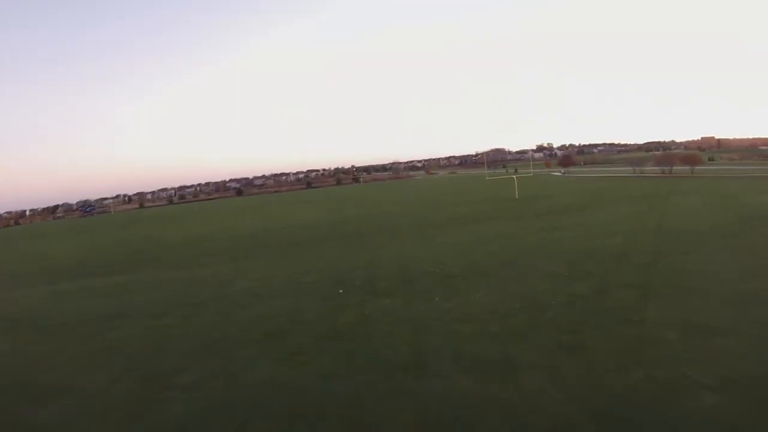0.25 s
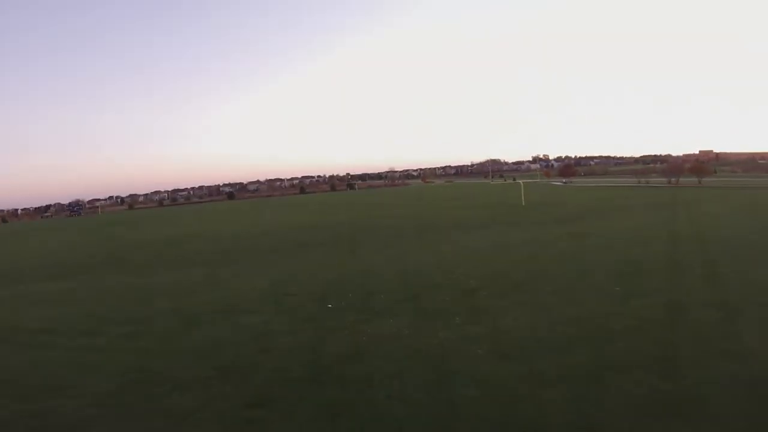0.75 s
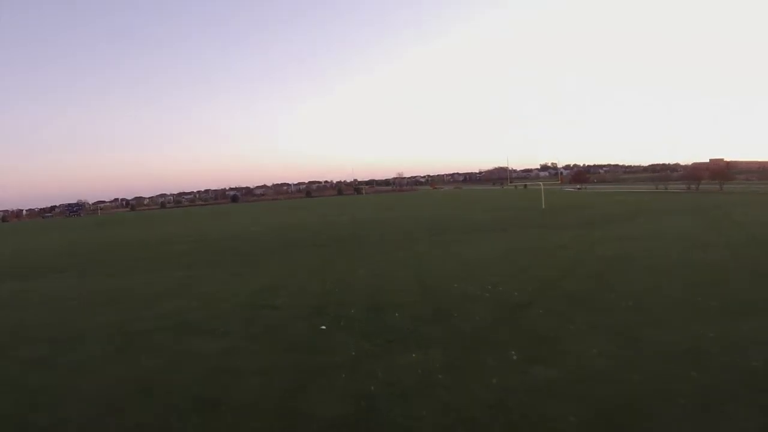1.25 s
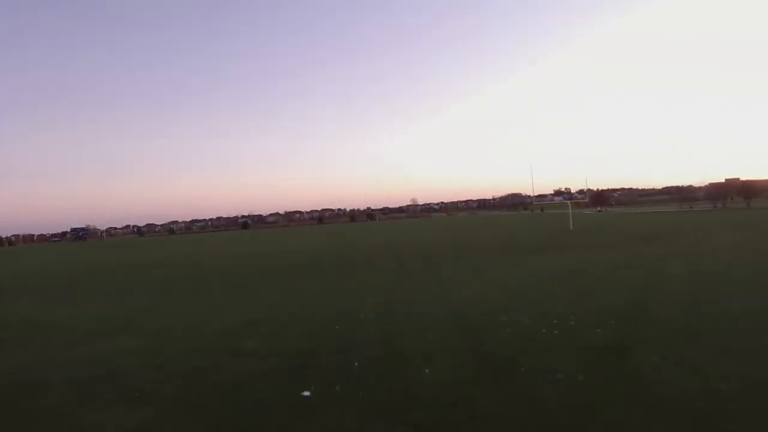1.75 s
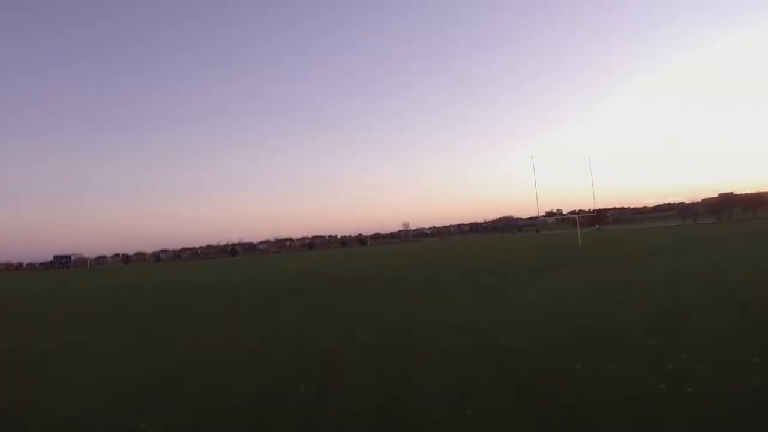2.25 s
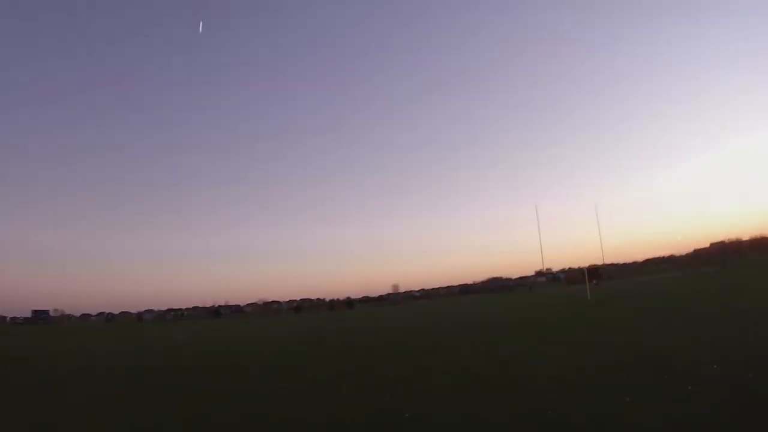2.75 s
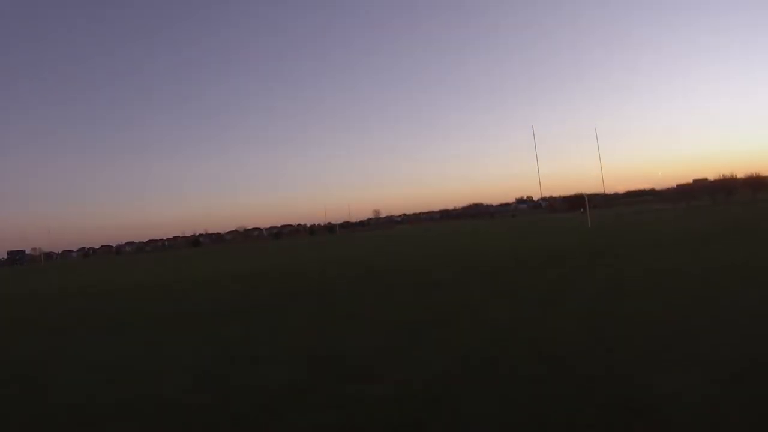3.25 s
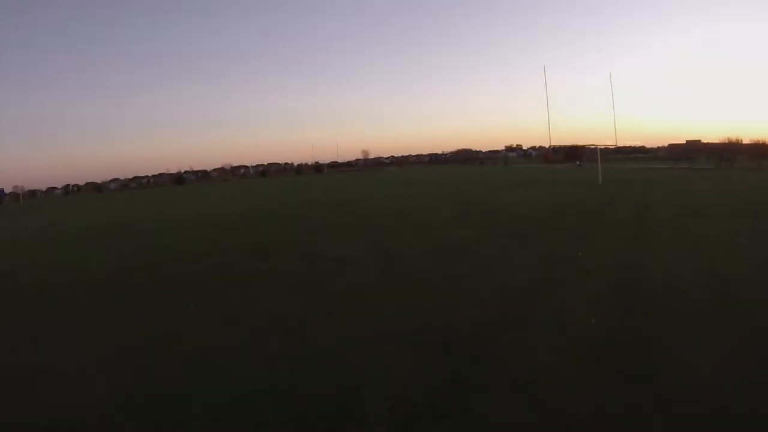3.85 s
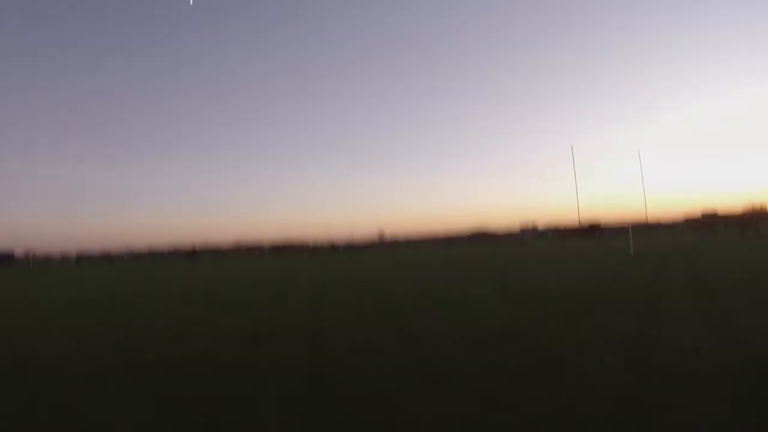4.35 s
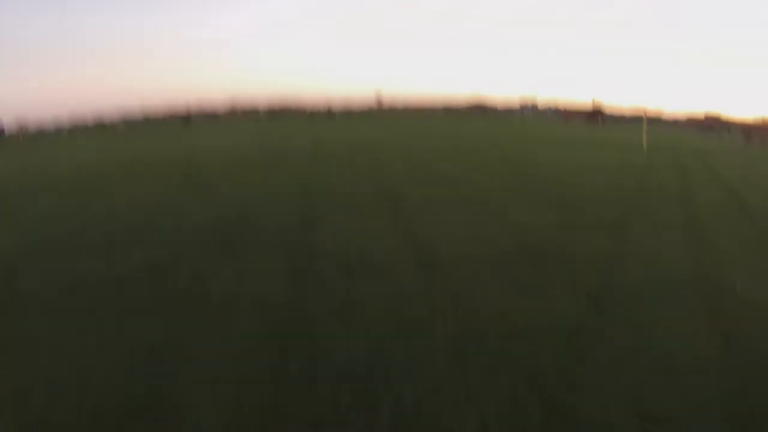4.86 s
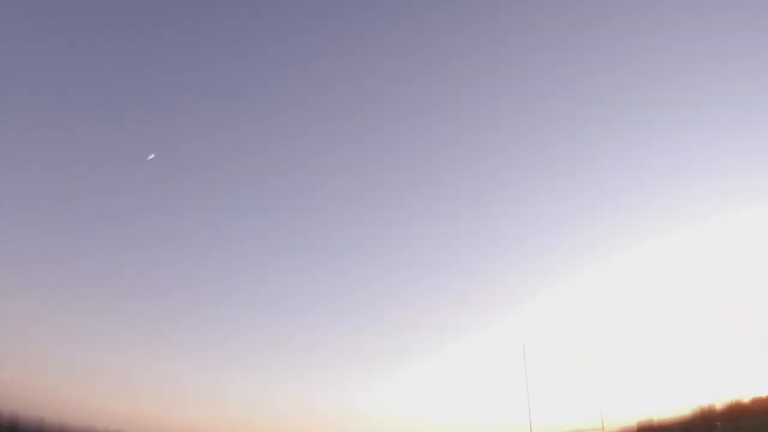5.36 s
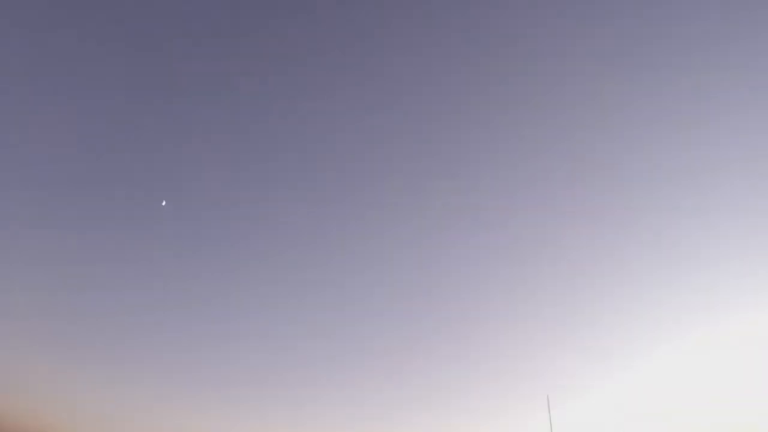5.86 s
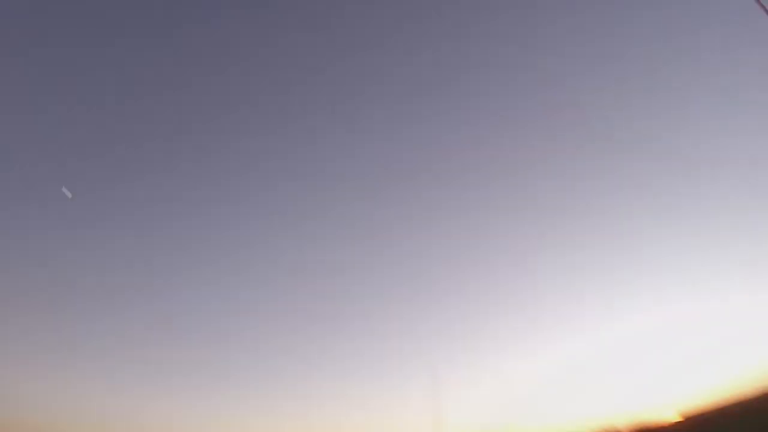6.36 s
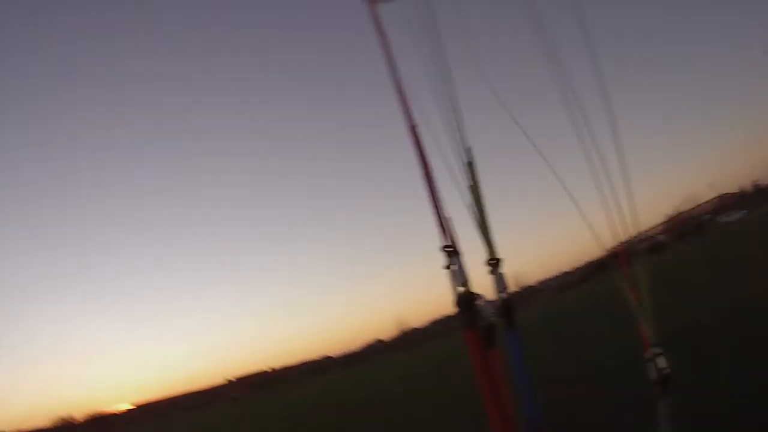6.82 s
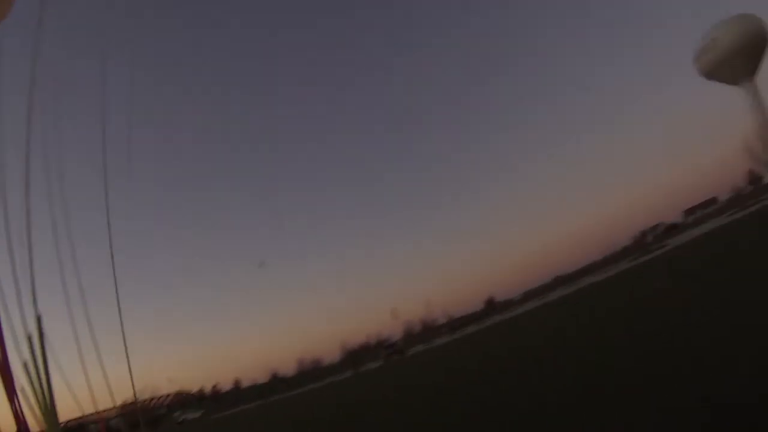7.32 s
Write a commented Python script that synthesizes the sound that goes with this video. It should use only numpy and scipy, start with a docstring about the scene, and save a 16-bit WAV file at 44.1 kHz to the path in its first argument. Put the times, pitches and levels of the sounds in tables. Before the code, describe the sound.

A muffled, fluttering engine-and-wind roar with a faint falling whistle fades, then a loose plastic case clacks, chatters and booms to the end.

```python
"""A muffled, fluttering roar with a faint falling whistle; then a plastic case clacks, chatters and booms.
Engine, propeller and airflow of a powered paraglider reach a camera through its closed case: shaped noise.
The case works loose: bouncing contacts excite its damped modes, jolts set it booming and its mount swinging.
Random ticks, nudges and a few treble snaps fill in; a look-ahead limiter and a low-pass follow."""
import sys
import numpy as np
from scipy import signal
from scipy.fft import rfft, irfft
from scipy.io import wavfile
from scipy.ndimage import uniform_filter1d, minimum_filter1d

SR = 44100
rng = np.random.default_rng(int(sys.argv[2]) if len(sys.argv) > 2 else 0)


def bounce(signal):
    """Save signal as a 16-bit WAV file at the path given by the first command-line argument."""
    frames = np.transpose(np.atleast_2d(signal))
    limited = np.clip(frames, -1, 1)
    pcm = np.round(limited * 32767).astype(np.int16)
    wavfile.write(sys.argv[1], SR, pcm)


N = 334719

# modes of the case shell: [f/Hz, level/dB, t60/s]
SHELL_MODES = [(575, 11, 0.0072), (599, 6.5, 0.024), (1022, 5.5, 0.013), (1421, -8, 0.035),
               (1672, 1.5, 0.014), (1956, 3.5, 0.0037), (2165, 3, 0.016), (3000, -10, 0.008),
               (3450, -18.5, 0.012), (3970, -35, 0.015), (5040, -30.5, 0.016), (5200, -30.5, .008),
               (6320, -33.5, 0.0096)]
# low booming modes of the case: [f/Hz, level/dB, t60/s]
BOOM_MODES = [(196.2, -1, 0.072), (116, 2.5, 0.02)]
# slow modes of the mount: [f/Hz, level/dB, t60/s]
SWING_MODES = [(27.14, 10.3, 0.3), (45.2, 7.3, 0.086)]
# bands the case passes weakly: [low f/Hz, high f/Hz, share lost/0-1]
WEAK_BANDS = [(2424, 2850, 0.6), (5670, 5950, 0.9)]
SHELL_CUT_HZ = 7850  # the case dulls clacks and ticks above this


def amp(db):
    """Gain of a level in dB."""
    return 10 ** (np.asarray(db) / 20)


def rms_one(x):
    """Scale to rms 1."""
    return x / np.sqrt(np.mean(x ** 2) + 1e-20)


def in_time(rows):
    """Columns of a curve table, interpolated to every sample."""
    s, *columns = np.transpose(rows)
    return [np.interp(np.arange(N) / SR, s, c) for c in columns]


def lowpass(x, hz):
    """Second-order low-pass."""
    return signal.sosfilt(signal.butter(2, hz, fs=SR, output="sos"), x)


def drift(hz):
    """Low-passed noise of rms 1, without the filter's first second."""
    return rms_one(lowpass(rng.standard_normal(N + SR), hz)[SR:])


def decay_per_sample(t60_s):
    """Factor that gives a 60 dB decay in t60_s."""
    return amp(-60 / (t60_s * SR))


def impulses(at, sizes):
    """Clicks of the given sizes at the given samples."""
    return np.bincount(at, sizes, N)[:N]


def ring(clicks, hz, t60_s):
    """Two-pole resonator: a unit click starts a decaying sine of height 1."""
    r, w = decay_per_sample(t60_s), 2 * np.pi * hz / SR
    return signal.lfilter([0, np.sin(w)], [1, -2 * r * np.cos(w), r * r], clicks + 1e-18)


def strike(at, sizes, modes, hollow_db=0, scatter_db=3.5, treble_db=0, count=1):
    """Each contact excites each mode by a chance share, partly common to the count contacts of a blow."""
    hollow_hz, bright_hz, hard_hz = 600, 2100, 3700  # no hollow part from hard_hz up
    contact_cut = 2.4  # contact low-pass, in multiples of the mode's pitch
    luck = rng.standard_normal((len(at), len(modes)))
    blow_luck = rng.standard_normal((len(at) // count, len(modes)))
    luck = luck + .5 * np.repeat(blow_luck, count, axis=0)
    out = np.zeros(N)
    for k, ((hz, level_db, t60_s), own) in enumerate(zip(modes, luck.T)):
        # modes far from the bright ring follow the hollow part more
        distance = abs(np.log(bright_hz / hz)) / np.log(bright_hz / hollow_hz)
        depth = np.minimum(distance, 1) * (hz < hard_hz)
        share_db = level_db + scatter_db * own + depth * hollow_db
        share_db = share_db + (hz > WEAK_BANDS[0][0]) * treble_db
        clicks = impulses(at, sizes * amp(share_db))
        for _ in range(2):  # softens the onset of the ring
            clicks = lowpass(clicks, contact_cut * hz)
        out += (-1) ** k * ring(clicks, hz, t60_s)  # neighbours start in opposite directions
    return out


def roar():
    """Broad noise with resonances of case and air cavity; its level follows a curve and flutters."""
    # overall level: [t/s, level/dB]
    roar_level = [(0, -33), (2.2, -36.5), (2.37, -42.5), (3.75, -49), (7.59, -51.5)]
    # broad spectrum: [f/Hz, density/dB per Hz, relative]
    roar_colour = [(12, -8.5), (160, -8), (300, -14.5), (900, -20), (1100, -26), (2400, -21.5), (3800, -31),
                   (4300, -43), (5800, -59), (10000, -50), (15000, -73)]
    # resonances: [f/Hz, width/Hz, density/dB per Hz, relative]
    roar_peaks = [(199.7, 31, 1), (739, 35, -4.5), (1320, 680, -15), (1740, 790, -16.5),
                  (4900, 1100, -34.5), (6800, 2100, -42), (7900, 270, -40.5)]
    flutter_db, flutter_hz = .7, 7
    hz = np.maximum(np.arange(N // 2 + 1) * SR / N, 1)
    colour_hz, colour_db = np.transpose(roar_colour)
    power = amp(np.interp(np.log(hz), np.log(colour_hz), colour_db)) ** 2
    for centre_hz, width_hz, level_db in roar_peaks:
        power += amp(level_db) ** 2 / (1 + (2 * (hz - centre_hz) / width_hz) ** 2) ** 2
    noise = irfft(rfft(rng.standard_normal(N)) * np.sqrt(power), N)
    return rms_one(noise) * amp(in_time(roar_level)[0] + flutter_db * drift(flutter_hz))


def whistle():
    """A sine of falling, unsteady pitch: phase is the running sum of frequency."""
    # glide: [t/s, f/Hz, peak level/dB]
    whistle_glide = [(1.25, 3730, -62), (1.5, 3570, -54), (1.92, 3420, -56), (2.1, 3400, -78)]
    hz, level_db = in_time(whistle_glide)
    unsteady_hz = hz + 20 * drift(33)
    return amp(level_db) * np.sin(2 * np.pi * np.cumsum(unsteady_hz) / SR)


def snaps():
    """A few contacts end in a snap: high-passed noise that dies within milliseconds."""
    # snaps: [t/s, starting noise level before the high-pass/dB]
    snap_list = [(2.362, -32.5), (2.91, -39), (6.304, -41), (7.34, -43)]
    snap_hz, t60_s = 5000, 0.0099
    s, level_db = np.transpose(snap_list)
    clicks = impulses((s * SR).astype(int), amp(level_db))
    fade = signal.lfilter([1], [1, -decay_per_sample(t60_s)], clicks + 1e-18)
    highpass = signal.butter(2, snap_hz, "high", fs=SR, output="sos")
    return signal.sosfilt(highpass, fade * rng.standard_normal(N))


def rattle():
    """Light random contacts of the loose case, in clumps: each ticks the shell and nudges case and mount."""
    # looseness of the case: [t/s, share/0-1]
    looseness = [(2.75, 0), (2.85, .5), (3.35, .5), (3.4, .02), (3.75, .02), (3.9, 1)]
    ticks_per_s = 90.0  # before looseness and clumping
    tick_db, tick_spread_db = -55.5, 7.0
    nudge_boom_db, nudge_swing_db, nudge_spread_db = -22.5, -35, 1.5
    rate_per_s = ticks_per_s * in_time(looseness)[0] * amp(6.0 * drift(15))
    at = np.flatnonzero(rng.random(N) < rate_per_s / SR)
    luck = np.minimum(rng.exponential(1, len(at)), 3)
    way = rng.choice([-1, 1], len(at))
    ticks = strike(at, way * amp(tick_db + tick_spread_db * luck), SHELL_MODES, hollow_db=7.0)
    push = way * amp(nudge_spread_db * luck)
    case_boom = strike(at, push * amp(nudge_boom_db), BOOM_MODES)
    mount_swing = strike(at, push * amp(nudge_swing_db), SWING_MODES)
    return lowpass(ticks, SHELL_CUT_HZ) + case_boom + mount_swing


def deep_ring(s, level_db):
    """The case's deep ring starts flat by a chance amount and rises to its resting pitch."""
    rest_hz, t60_s = 204, 0.25
    max_sag_hz, settle_s = 43, 0.021  # greatest flatness at the start, its time constant
    t = np.arange(int(t60_s * SR)) / SR
    sag_hz = max_sag_hz * rng.random((len(s), 1))
    turns = rest_hz * t - sag_hz * settle_s * (1 - np.exp(-t / settle_s))
    fade = amp(level_db[:, None] - 60 * t / t60_s)
    onset = np.minimum(rest_hz * t, 1)  # over one cycle
    rings = fade * onset * np.sin(2 * np.pi * turns)
    at = (s[:, None] * SR).astype(int) + np.arange(len(t))
    return impulses(at.ravel(), rings.ravel())


def jolts():
    """Heavy pushes: the case booms and the mount swings slowly, starting either way."""
    # jolts: [t/s, boom drive/dB, swing drive/dB]
    jolt_list = [(2.362, -18.5, -43), (2.537, -22, -39.5), (2.616, -17.5, -59), (2.73, -18.5, -65),
                 (2.82, -51, -17.5), (2.891, -48, -17), (3.118, -9, -23), (3.188, -15.5, -22.5),
                 (3.366, -23, -20), (3.63, -27, -29.5), (3.805, -11.5, -16), (3.877, -17, -15.5),
                 (4.005, -10, -26.5), (4.224, -13.5, -13), (4.38, -9, -15.5), (4.448, -15, -14.5),
                 (4.66, -14.5, -15), (4.808, -13.5, -17), (4.87, -10.5, -16), (4.995, -10, -13.5),
                 (5.113, -9.5, -5), (5.241, -13.5, -15), (5.347, -11.5, -16.5), (5.477, -8, -11),
                 (5.548, -15, -21), (5.633, -13.5, -37), (5.745, -15.5, -18), (5.866, -16, -19.5),
                 (6.057, -12.5, -18.5), (6.22, -12, -19.5), (6.305, -13.5, -21.5), (6.377, -10, -21.5),
                 (6.456, -11.5, -12), (6.533, -4, -15), (6.619, -8.5, -17.5), (6.765, -12, -18),
                 (6.885, -9, -12.5), (6.938, -12, -14), (7.004, -16, -26), (7.201, -17, -25.5),
                 (7.28, -13, -30), (7.37, -15, -13), (7.453, -9, -33)]
    steady_scatter_db = 1.2
    s, boom_db, swing_db = np.transpose(jolt_list)
    at, way = (s * SR).astype(int), rng.choice([-1, 1], len(s))
    deep = deep_ring(s, boom_db)
    case_boom = strike(at, amp(boom_db), BOOM_MODES, scatter_db=steady_scatter_db)
    mount_swing = strike(at, way * amp(swing_db), SWING_MODES, scatter_db=steady_scatter_db)
    return deep + case_boom + mount_swing


def clacks(count=18):
    """Case on mount: a first contact, then quick weaker bounces that stop; soft blows sound hollower."""
    # clear blows: [t/s, drive of the bright ring/dB, chatter length/s]
    blows = [(2.304, -26.5, 0.011), (2.36, 1, 0.012), (2.5377, -5, 0.018), (2.615, -5.5, 0.025),
             (2.6615, -16, 0.03), (2.729, -6.5, 0.035), (2.797, -28.5, 0.037), (2.818, -21.5, 0.0069),
             (2.8799, -21.5, 0.02), (2.9085, -25.5, 0.0034), (3.032, -2.5, 0.021), (3.057, -8, 0.0053),
             (3.0978, -27, 0.03), (3.1545, -20.5, 0.0089), (3.1669, -19, 0.0089), (3.2247, -23.5, 0.037),
             (3.28, -5.5, 0.0092), (3.3144, -7.5, 0.012), (3.3666, -14.5, 0.0078), (3.5206, -15.5, 0.0057),
             (3.629, -27.5, 0.006), (3.7274, -26.5, 0.0067), (3.7748, -24.5, 0.037), (3.7894, -8, 0.01),
             (3.845, -27, 0.021), (3.8602, -23.5, 0.016), (3.971, -27, 0.023), (4.0077, -25, 0.017),
             (4.0692, -6.5, 0.014), (4.139, -12, 0.0059), (4.162, -28.5, 0.016), (4.1998, -17, 0.025),
             (4.34, -7.5, 0.0034), (4.377, -18.5, 0.02), (4.441, -27.5, 0.01), (4.5752, -39.5, 0.0067),
             (4.59, -18.5, 0.011), (4.638, -24.5, 0.013), (4.6812, -26.5, 0.0058), (4.7178, -22.5, 0.017),
             (4.7854, -24, 0.013), (4.814, -28.5, 0.016), (4.8482, -30.5, 0.0052), (4.869, -29, 0.016),
             (4.9378, -23.5, 0.021), (4.9869, -19.5, 0.022), (5.115, -25, 0.011), (5.1425, -18.5, 0.011),
             (5.201, -29, 0.0041), (5.2287, -33.5, 0.017), (5.268, -24, 0.012), (5.3433, -28.5, 0.01),
             (5.4244, -30.5, 0.014), (5.477, -23.5, 0.014), (5.5415, -21, 0.01), (5.5933, -34, 0.022),
             (5.6797, -24, 0.014), (5.7254, -19, 0.017), (5.8036, -30, 0.008), (5.8564, -20, 0.011),
             (5.9457, -17.5, 0.0099), (5.9926, -11.5, 0.0048), (6.0371, -12.5, 0.0095),
             (6.124, -11.5, 0.012), (6.1817, -36, 0.0071), (6.2051, -26.5, 0.024), (6.3051, -8, 0.0083),
             (6.354, -35, 0.023), (6.3734, -23.5, 0.014), (6.4511, -22.5, 0.024), (6.495, -29.5, 0.017),
             (6.5282, -27, 0.016), (6.587, -29, 0.006), (6.6193, -26, 0.025), (6.734, -34.5, 0.0053),
             (6.762, -27, 0.0096), (6.799, -23, 0.013), (6.868, -28, 0.0081), (6.884, -26, 0.0084),
             (6.9261, -24.5, 0.018), (6.9693, -27.5, 0.0076), (7.0497, -25.5, 0.017),
             (7.155, -11.5, 0.0074), (7.203, -16, 0.0057), (7.255, -28.5, 0.0096), (7.281, -36.5, 0.015),
             (7.3371, -13, 0.0068), (7.361, -28, .005), (7.369, -16, 0.019), (7.41, -26.5, 0.027),
             (7.452, -23.5, 0.013), (7.4834, -14.5, 0.0093), (7.501, -21, 0.014), (7.5446, -18, 0.0091)]
    # hollow part of a 0 dB blow, growing as the case loosens: [t/s, level re ring/dB]
    hollow_growth = [(3.55, -27.5), (4.6, -24)]
    hollow_gain_per_db = 1.45  # growth per dB of softness
    gap_s, gap_spread_s = .0018, 0.002  # least gap between bounces, mean extra
    chatter_loss_db, scrape_db = 13, -37.5  # loss over a chatter of a 0 dB blow; none at scrape_db
    bounce_spread_db, bounce_dull_db = 8, -4  # greatest chance weakness; treble loss of bounces
    s, drive_db, length_s = np.transpose(blows)[:, :, None]
    hollow_db = np.interp(s, *np.transpose(hollow_growth)) - hollow_gain_per_db * drive_db
    hollow_db = np.minimum(hollow_db, 0)
    luck = rng.random((len(blows), 2, count))
    late_s = np.cumsum(gap_s - gap_spread_s * np.log(1 - luck[:, 0]), axis=1)
    late_s -= late_s[:, :1]
    is_bounce = late_s > 0
    spent = late_s / np.maximum(length_s, .002)
    loss_db = chatter_loss_db * np.maximum(1 - drive_db / scrape_db, 0) * spent
    weakness_db = bounce_spread_db * luck[:, 1] * is_bounce
    sizes = amp(drive_db - loss_db - weakness_db) / (1 + spent ** 8)  # chatter stops past its length
    at = ((s + late_s) * SR).astype(int)
    rings = strike(at.ravel(), sizes.ravel(), SHELL_MODES, np.repeat(hollow_db, count),
                   treble_db=bounce_dull_db * is_bounce.ravel(), count=count)
    for low_hz, high_hz, share in WEAK_BANDS:
        bandpass = signal.butter(1, [low_hz, high_hz], "band", fs=SR, output="sos")
        rings = rings - share * signal.sosfilt(bandpass, rings)
    return lowpass(rings, SHELL_CUT_HZ)


def scene():
    """Sum of all sources at one microphone."""
    return (roar() + whistle() + clacks() + snaps() + rattle() + jolts())[None]


def record(dry, ahead=64):
    """Limiter with a look-ahead in samples and a slow linear release in dB, then a steep low-pass."""
    limit_db, release_db_per_s, cutoff_hz = -.5, 80, 16000
    over_db = np.maximum(20 * np.log10(np.abs(dry) + 1e-9) - limit_db, 0)
    ramp_db = release_db_per_s * np.arange(N) / SR
    cut_db = np.maximum.accumulate(over_db + ramp_db, axis=1) - ramp_db
    cut_db = -minimum_filter1d(-cut_db, size=2 * ahead + 1)  # hold the greatest cut nearby
    cut_db = uniform_filter1d(cut_db, size=ahead)
    top_cut = signal.cheby2(10, 60, cutoff_hz, fs=SR, output="sos")
    return signal.sosfilt(top_cut, dry * amp(-cut_db))


dry = scene()
out = record(dry)
bounce(out)
```